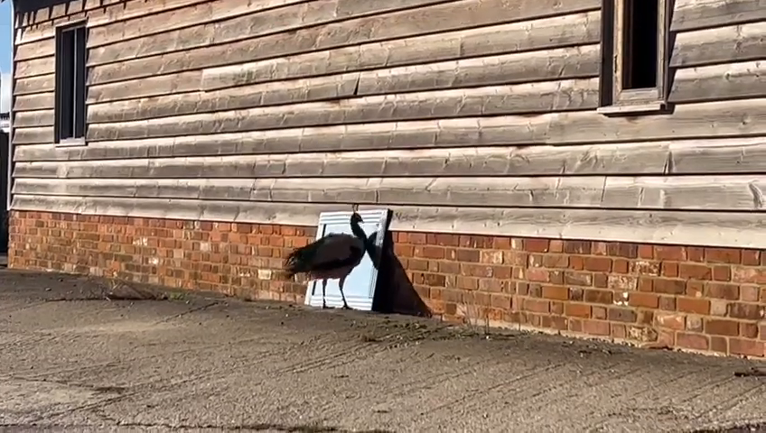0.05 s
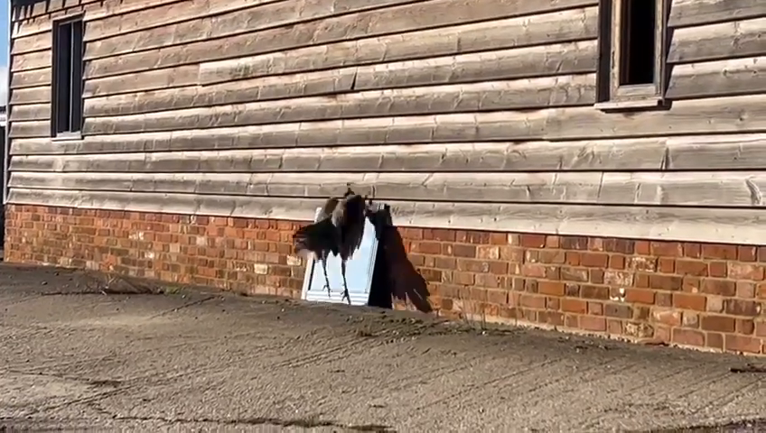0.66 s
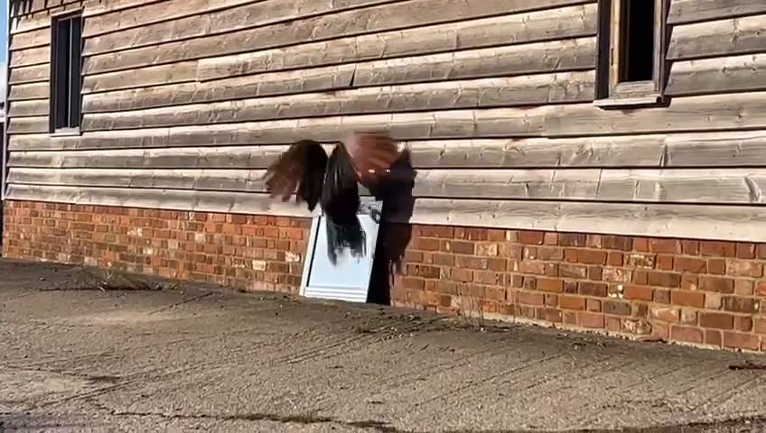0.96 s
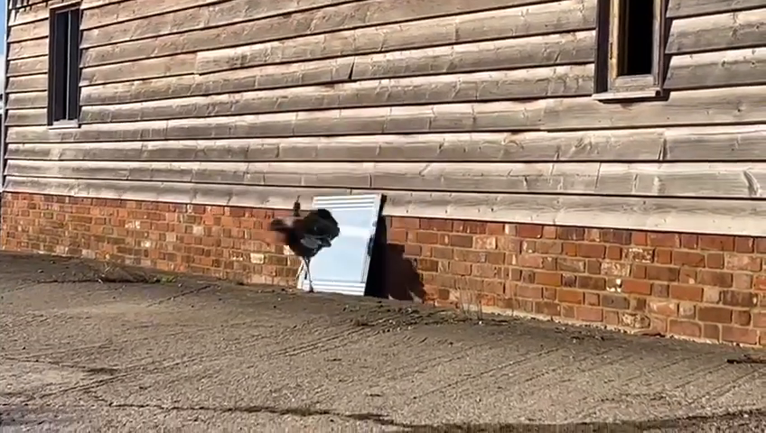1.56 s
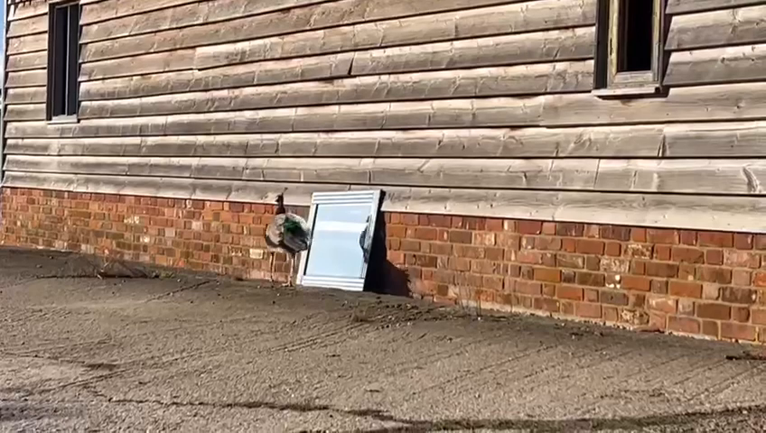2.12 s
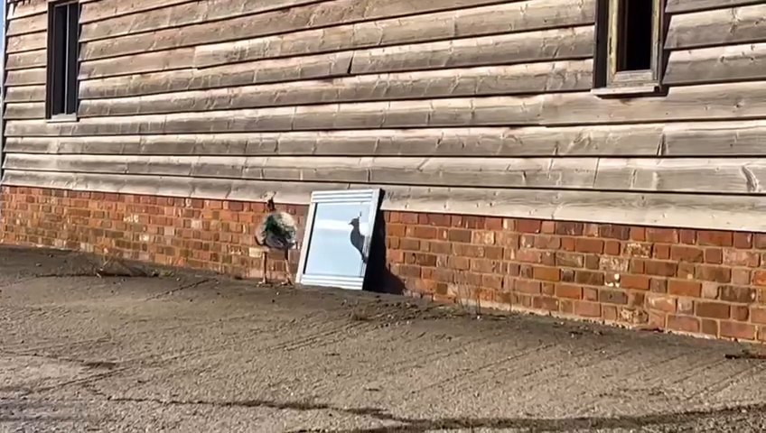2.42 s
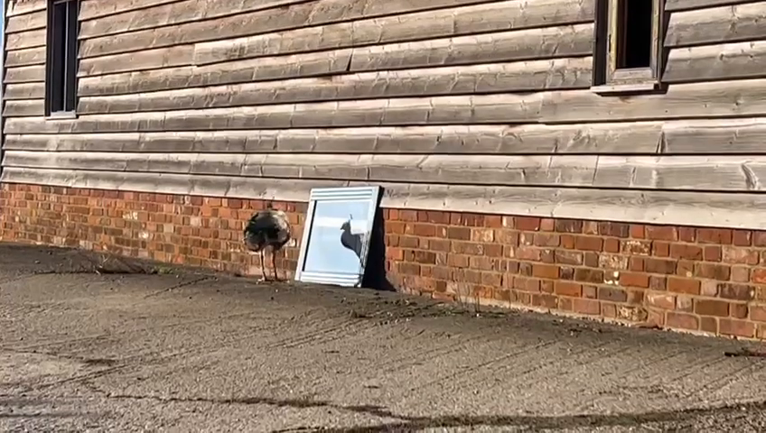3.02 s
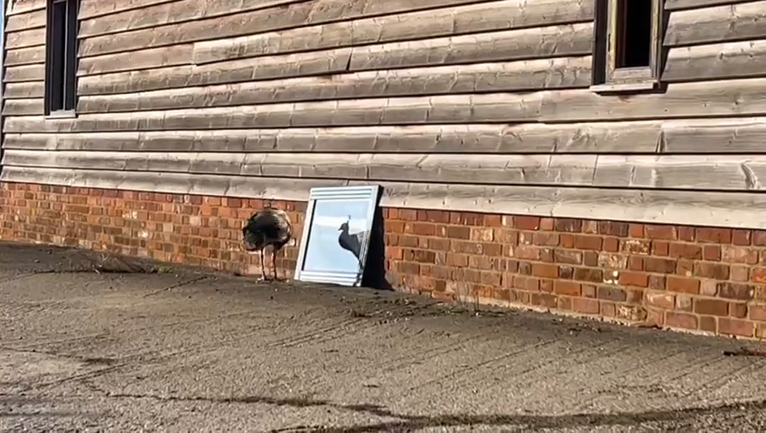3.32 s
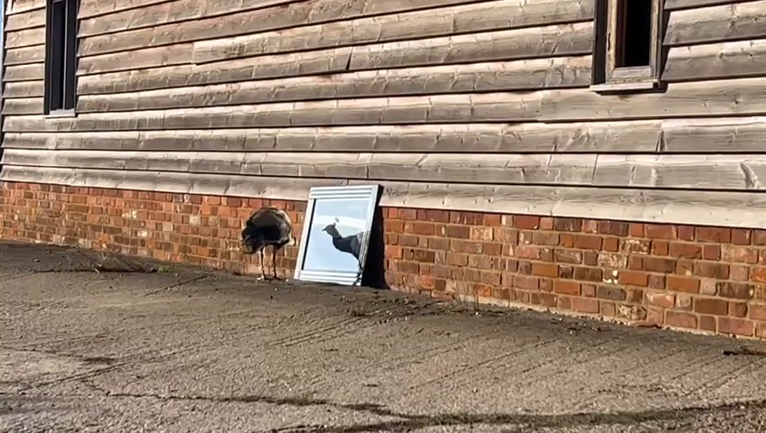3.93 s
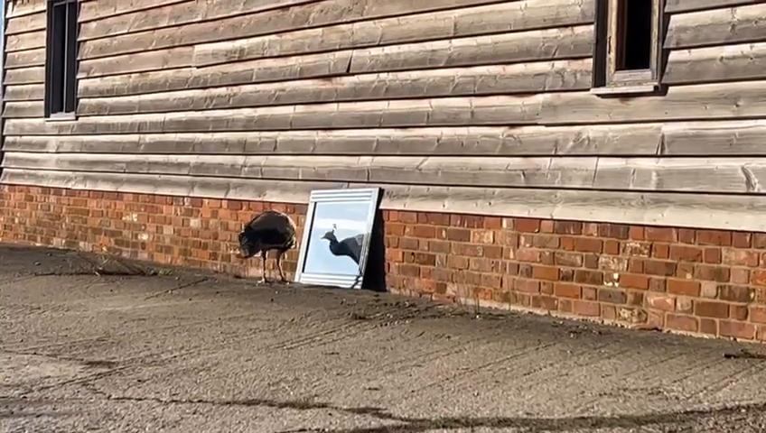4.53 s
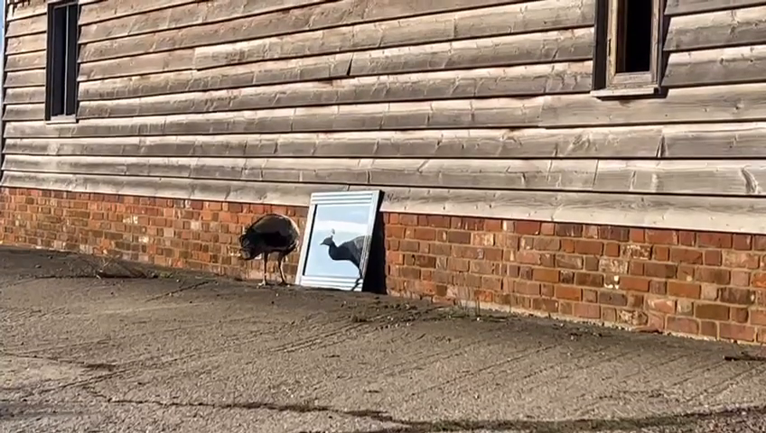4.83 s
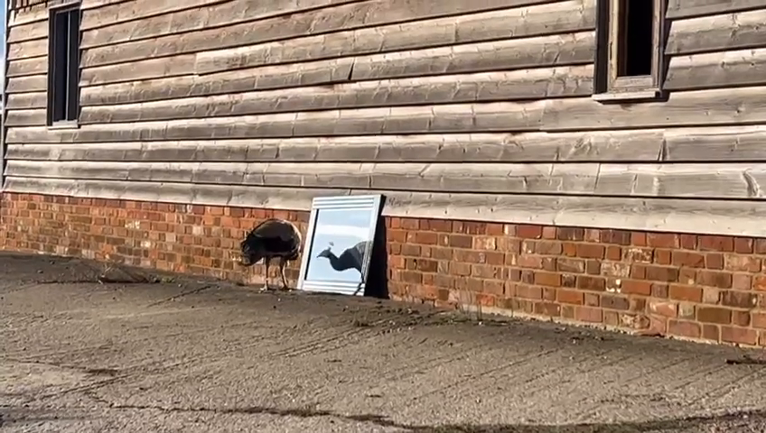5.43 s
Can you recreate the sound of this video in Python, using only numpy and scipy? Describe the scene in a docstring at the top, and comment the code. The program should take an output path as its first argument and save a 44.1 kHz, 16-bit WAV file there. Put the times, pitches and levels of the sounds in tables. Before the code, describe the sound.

A low transformer hum and a breeze rumbling on the microphone fill a farmyard, with a very faint hiss of distant leaves. At about 0.8 seconds a peafowl kicks a mirror leaning on a barn wall: one sharp, clattering knock that briefly rings and rattles the pane, with a short echo. Soft, quick wingbeats swish from 0.7 to 1.3 seconds, and claws tick lightly as the bird comes down. From about 1.8 seconds the wind starts bumping the microphone with dull, low thumps. A small bird nearby gives high, slightly raspy chirps at 3.1 and 3.9 seconds, a quick three around 4.6, and a faint one at 5.3. Something creaks softly at 3.9 seconds. The hum sinks around 4.5 seconds, while the wind thumps come thicker and harder, the loudest at about 5.3 seconds, just before the end.

```python
"""A transformer hums in a barnyard; a breeze rumbles on the microphone and far leaves hiss. At 0.8 s a peafowl
leaps at a mirror leaning on the barn wall: its wings beat from 0.67 s, one clattering kick rings the pane, and
wings and claws go on as it comes down. From 3.1 s a small bird chirps nearby; at 3.9 s something creaks softly.
The hum sinks and the breeze ends in a run of dull thumps as its eddies strike the microphone's two ports."""
import sys
import numpy as np
from scipy import signal
from scipy.fft import rfft, irfft, next_fast_len
from scipy.io import wavfile
from scipy.ndimage import map_coordinates

SR = 44100
rng = np.random.default_rng(int(sys.argv[2]) if len(sys.argv) > 2 else 0)


def persist_wave(psi):
    """Save psi, clipped to +-1, as 16-bit WAV."""
    counts = np.round(np.clip(psi, -1, 1) * 32767).astype(np.int16)
    wavfile.write(sys.argv[1], SR, np.atleast_2d(counts).T)


N = 250047

# Contacts on the mirror. Each row: start in seconds, level in dB, brightness in Hz, ring share in dB.
KICK_CONTACTS = [(.785, -29.5, 2260, -15), (0.7867, -27, 1680, -9), (.7899, -21, 4000, -13),
                 (0.7906, -16.5, 1220, -3), (.7914, -20.5, 600, -2), (0.7955, -26.5, 2300, -7.5),
                 (0.8066, -34, 900, -1.5), (0.8231, -33.5, 762, -6), (.825, -31.5, 170, 2),
                 (.854, -41, 300, 2), (.893, -43, 280, 3), (.921, -38, 620, -15), (.945, -36, 500, -13.5),
                 (.956, -38.5, 700, -11), (0.97, -42.5, 1470, -8)]
# Modes of glass and frame. Each row: frequency in Hz, relative level in dB, t60 in seconds.
MIRROR_MODES = [(108.7, -14.5, 0.18), (209, -10, 0.16), (290.3, 1, 0.13), (349, -4.5, 0.1),
                (525, -11, 0.11), (640, -5.5, 0.082), (800, -17, .07), (1083, -15, 0.073),
                (1225, -21, 0.19), (1511, -8.5, 0.098), (1680, -16, 0.11), (2060, -13, .08),
                (2334, -9, 0.09), (2690, -15, .11), (3770, -20, .12)]
def kick(crack_cycles=24, attack_cycles=1.03, swell_cycles=1.35, sag=.1, sag_s=.022, bend_hz=420):
    """Claws, feet and body hit the glass: each cracks and rings the pane, soft ones only its low modes."""
    out, t = np.zeros(N), clock(SR // 2)
    for start_s, db, bright_hz, ring_db in KICK_CONTACTS:
        ring = np.zeros(len(t))
        for hz, mode_db, t60_s in MIRROR_MODES:
            bend = sag * np.exp(-t / sag_s) / (1 + (hz / bend_hz) ** 4)  # low modes sink as it unbends
            load = .01 * rng.normal() * hz / (hz + bend_hz)  # the bird's weight shifts the loose pane
            rattle = .014 * band(len(t), 60, q=.96)
            phase = 2 * np.pi * hz * np.cumsum(1 + bend + load + rattle) / SR
            gain = amp(mode_db + rng.normal(0, 1)) / np.hypot(1, (hz / bright_hz / 1.25) ** 2)
            ring += gain * fade(t, t60_s) * (1 - np.exp(-t * hz / swell_cycles)) * np.sin(phase)
        attack = 1 - np.exp(-t * bright_hz / attack_cycles)
        crack = band(len(t), bright_hz, q=1.72) * fade(t, crack_cycles / bright_hz) * attack
        add(out, start_s, amp(db) * (crack + amp(ring_db) * ring))
    return out


def kick_tail(level_db=-38.5, t60_s=.18, centre_hz=1970, uneven_db=4):
    """A rough, diffuse noise tail rings on after the main blow."""
    out, t = np.zeros(N), clock(SR // 2)
    blow_s = max(KICK_CONTACTS, key=lambda row: row[1])[0]
    grain = unit(band(len(t), centre_hz, q=.66) * amp(uneven_db * wobble(400)[:len(t)]))
    add(out, blow_s, amp(level_db) * grain * fade(t, t60_s))
    return out


# Wing effort. Each row: time in seconds, level in dB.
WING_EFFORT = [(.67, -63.5), (.83, -58.5), (.92, -61), (1.08, -65.5), (1.16, -62.5), (1.25, -64.5)]
# Wing tips on the wall. Each row: peak time in seconds, level in dB, centre in Hz.
WING_BRUSHES = [(0.744, -59, 3020), (.819, -52.5, 2920), (0.944, -54.5, 2710), (.963, -54.5, 2570),
                (1.011, -56.5, 4690), (1.133, -55.5, 4240), (1.157, -50.5, 6330)]
def wings(first_s=.672, gap_s=.0815, strokes=8, hiss_hz=3860, whoosh_hz=405, whoosh_db=4.5, flutter_db=3):
    """Steady strokes: stiff feathers hiss, push air aside and brush the wall."""
    out, t = np.zeros(N), clock(SR // 4) - 1 / 8

    def swish(hz, sigma_s=.02):
        return band(len(t), hz, q=.68) * np.exp(-(t / sigma_s) ** 2 / 2)

    for peak_s in first_s + gap_s * np.arange(strokes):
        stroke = swish(hiss_hz) + amp(whoosh_db) * swish(whoosh_hz)
        add(out, peak_s + t[0], amp(at_time(WING_EFFORT, peak_s)) * stroke)
    for peak_s, db, hz in WING_BRUSHES:
        add(out, peak_s + t[0], amp(db) * swish(hz, sigma_s=.0071))
    return out * amp(flutter_db * wobble(300))


# Claw contacts. Each row: start in seconds, level in dB, centre in Hz, t60 in seconds, resonance Q.
CLAW_TICKS = [(.988, -51, 4240, .02, 1.2), (.997, -47.5, 4260, 0.047, 1.7), (1.0187, -40.5, 6160, 0.017, 2),
              (1.0206, -43, 3860, 0.018, 1.4), (1.04, -55, 3750, 0.065, .9),
              (1.22, -47.5, 5700, 0.055, 0.59), (1.24, -53, 4170, .012, .7),
              (4.256, -56.5, 6500, 0.018, 0.81), (5.4795, -52, 1890, 0.031, 1.8),
              (5.48, -61, 3360, 0.12, 1.0)]
def claws():
    """Claws tick and scratch on the frame and on gritty concrete."""
    out, t = np.zeros(N), clock(SR // 8)
    for start_s, db, hz, t60_s, q in CLAW_TICKS:
        add(out, start_s, amp(db) * band(len(t), hz, q) * fade(t, t60_s))
    return out


# Arched calls. Each row: start and length in seconds, level in dB, start, top and end pitch in Hz,
# moment of the rise from 0 to 1, opening dip in Hz, harsh onset in dB, upper voice in dB,
# upper voice pitch ratio, fade over the fall in dB.
CHIRPS = [(3.136, 0.2, -52.5, 2460, 3624, 2775, .42, 449.5, -10, -0.5, 1.16, 8.5),
          (3.877, 0.19, -53, 2117, 3380, 1997, 0.28, 0.5, 2, 2, 1.21, 10),
          (4.544, .11, -56.5, 2350, 3115, 2660, 0.36, 101, 0, -5, 1.14, 5.5),
          (4.65, 0.072, -57, 2840, 3750, 3270, 0.16, -0.5, -14, -1, 1.12, 3),
          (4.699, .124, -48, 2500, 3757, 3550, .35, 99.5, -5.5, -11, 1.07, 12),
          (5.345, 0.16, -61, 2740, 3370, 2700, .26, 0.5, -7, -4, 1.2, -2)]
# Chirp colour: bright near 3.8 and 5.3 kHz, dipping between. Each row: frequency in Hz, gain in dB.
CHIRP_COLOUR = [(1900, -8.5), (2500, -3), (3100, -4.5), (3750, 0), (4200, -1.5), (4650, -9.5), (5300, -1),
                (6200, -8), (8000, -9)]
def small_bird(dip_s=.025, rise_s=.006, fall_from=.6, opening_db=-3.5):
    """Both sides of the syrinx chirp: a low harsh opening, a leap to a rasp, then a fall."""
    out = np.zeros(N)
    hiss = .51 * band(N, 5400, q=2.4)
    for (start_s, length_s, db, start_hz, top_hz, end_hz,
         rise_at, dip_hz, harsh_db, upper_db, upper_ratio, fall_db) in CHIRPS:
        progress, gate = note(start_s, length_s)
        dip = np.exp(-(progress * length_s / dip_s) ** 2)
        rise = (1 + np.tanh((progress - rise_at) * length_s / rise_s / 2)) / 2
        fall = np.clip((progress - fall_from) / (1 - fall_from), 0, 1) ** 1.5
        hz = start_hz + dip_hz * dip + (top_hz - start_hz) * rise + (end_hz - top_hz) * fall
        swell = np.clip(1.75 * progress / rise_at, .15, 1) ** 2
        harsh = amp(harsh_db) * (1 - rise) / swell ** .98  # stays level while the fundamental swells in
        upper_gain = amp(upper_db) * (.71 + .29 * rise)
        voice = syrinx(hz, harsh) + upper_gain * syrinx(upper_ratio * hz, harsh) + harsh * hiss
        out += gate * swell * amp(db + opening_db * (1 - rise) - fall_db * fall) * voice
    return filtered(out, lambda hz: amp(at_hz(CHIRP_COLOUR, hz)))


def syrinx(hz, harsh, rasp=.033, hoarse_db=-8, hoarse_hz=330, octave_db=-18, shimmer_db=3):
    """One side of a bird's voice: a rasping tone whose octave grows with harshness."""
    phase = 2 * np.pi * np.cumsum(hz * (1 + rasp * wobble(900))) / SR
    tone = np.sin(phase) + (harsh + amp(octave_db)) * np.sin(2 * phase)
    hoarse = 1 + amp(hoarse_db) * band(N, hoarse_hz, q=1)  # smears the tone into a narrow band
    return tone * unit(hoarse * amp(shimmer_db * wobble(170)))


def note(start_s, length_s, edge_s=.011):
    """Progress from 0 to 1 through a call, and its gate."""
    age_s = clock(N) - start_s
    gate = np.clip(np.minimum(age_s, length_s - age_s) / edge_s, 0, 1)
    return np.clip(age_s / length_s, 0, 1), gate


# Creak swell. Each row: time in seconds, relative level in dB.
CREAK_SWELL = [(3.87, -52), (3.905, -40.5), (4.004, -37), (4.028, -47)]
def creak(first_s=3.8695, gap_s=.021, slowing_s=.00055, slips=8, t60_s=.028, attack_s=.0036):
    """Soft slips slow a little as they swell, each exciting two hollow resonances."""
    out, t = np.zeros(N), clock(SR // 16)
    envelope = fade(t, t60_s) * (1 - np.exp(-t / attack_s))
    for k in range(slips):
        start_s = first_s + k * gap_s + slowing_s * k * (k - 1) / 2
        low = np.sin(2 * np.pi * rng.normal(538, 35) * t)
        high = amp(-14.5) * np.sin(2 * np.pi * rng.normal(1000, 70) * t)
        scrape = .39 * band(len(t), 655, q=3)
        add(out, start_s, 2 * amp(at_time(CREAK_SWELL, start_s)) * (low + high + scrape) * envelope)
    return out


# Eddies on the microphone. Each row: start in seconds, level in dB, start pitch in Hz, t60 in seconds.
EDDY_THUMPS = [(0.67, -30, 101, 0.13), (1.759, -30, 107, 0.31), (2.316, -36, 270, 0.32),
               (2.575, -30.5, 91, 0.27), (2.774, -22.5, 105, 0.13), (2.86, -24, 90.4, 0.16),
               (2.955, -30, 111, 0.26), (3.474, -25, 91, 0.14), (3.799, -35, 207, 0.3),
               (4.085, -21.5, 133, 0.13), (4.151, -22, 103, 0.084), (4.46, -24.5, 263, 0.073),
               (4.478, -24, 60, 0.21), (4.499, -23.5, 330, 0.047), (4.507, -17, 356, 0.07),
               (4.533, -15.5, 109, .07), (4.549, -31.5, 340, .07), (4.574, -20, 413, 0.09),
               (4.915, -18.5, 179, 0.13), (4.953, -27.5, 251, 0.15), (5.016, -35.5, 223, 0.17),
               (5.129, -22, 341, 0.19), (5.153, -22.5, 225, 0.088), (5.231, -27, 181, 0.19),
               (5.3267, -9.5, 411, 0.15), (5.348, -25, 552, 0.081), (5.3835, -19.5, 500, 0.091),
               (5.395, -12.5, 184, 0.075), (5.425, -33.5, 384, 0.18), (5.485, -27.5, 109, 0.15)]
def thumps(glide_s=.00762, attack_s=.0032, puff_db=-14, puff_t60_s=.3, spread=.058, octaves_per_db=.02):
    """Each eddy strikes both ports: a pressure swing that slows as it dies, with a dull puff."""
    out, t = np.zeros((2, N)), clock(SR // 3)
    glide = np.exp(-(t / glide_s) ** 1.95) * (1 + opposed(spread))  # the ports settle together
    attack = 1 - np.exp(-(t / attack_s) ** 2)
    for start_s, db, start_hz, t60_s in EDDY_THUMPS:
        end_hz = 79 * (start_hz / 200) ** .3  # faster eddies settle higher
        hz = end_hz + (start_hz - end_hz) * glide
        swing = np.sin(2 * np.pi * np.cumsum(hz, axis=1) / SR)
        puff = np.array([band(len(t), start_hz, q=1) for port in range(2)])
        push = (swing + amp(puff_db) * puff * fade(t, puff_t60_s)) * fade(t, t60_s) * attack
        cutoff_hz = 1.16 * start_hz * 2 ** (octaves_per_db * (db + 20))  # harder eddies are brighter
        lowpass = signal.butter(2, min(cutoff_hz, SR / 4), fs=SR, output="sos")
        add(out, start_s, amp(db) * signal.sosfilt(lowpass, push))
    return out


# Eddy rustles. Each row: start in seconds, level in dB, centre in Hz, t60 in seconds.
EDDY_SCUFFS = [(5.117, -59, 800, .1), (5.155, -50.5, 470, .2), (5.3275, -37, 650, 0.024),
               (5.346, -50, 700, 0.07), (5.385, -47, 555, .16)]
def scuffs(q=1.6, attack_s=.003):
    """The strongest eddies leave a rough, dull rustle at each port."""
    out, t = np.zeros((2, N)), clock(SR // 3)
    for start_s, db, hz, t60_s in EDDY_SCUFFS:
        rustle = band(len(t), hz, q) + opposed(band(len(t), hz, q))
        add(out, start_s, amp(db) * rustle * fade(t, t60_s) * (1 - np.exp(-t / attack_s)))
    return out


# Gusts. Each row: time in seconds, relative level in dB.
GUSTS = [(0, -61.5), (.27, -50.5), (.58, -55), (.9, -55.5), (1.2, -47), (1.35, -50.5), (1.65, -58),
         (1.8, -44), (2.12, -51.5), (2.35, -43), (2.58, -42), (2.7, -52.5), (2.82, -43.5), (3.04, -43),
         (3.15, -49.5), (3.65, -47.5), (3.9, -46.5), (4.3, -53), (4.5, -39), (4.68, -60.5), (4.86, -58.5),
         (5.05, -45.5), (5.28, -36.5), (5.44, -34), (5.56, -50)]
# Wind rumble. Each row: frequency in Hz, relative density in dB.
RUMBLE_SPECTRUM = [(20, -23.5), (35, -6.5), (55, 1), (80, 2), (130, -7), (250, -20.5), (450, -38.5),
                   (900, -51), (2000, -100)]
def breeze(gain_db=3, lumps_db=3, flutter_db=3.5, flutter_hz=520):
    """Lumpy low turbulence at the microphone; the strongest gusts add a higher flutter."""
    flow = amp(at_time(GUSTS, clock(N)) + gain_db)
    lumps = unit(amp(lumps_db * wobble(25)))
    flutter = np.array([band(N, flutter_hz, q=1) for port in range(2)])
    return lumps * (flow * rush(RUMBLE_SPECTRUM) + amp(flutter_db) * flow ** 2 * flutter)


# Hum loudness. Each row: time in seconds, level in dB.
HUM_LEVEL = [(0, -49), (.3, -43), (2.9, -43.5), (3.8, -45), (4.35, -44.5), (4.72, -53.5), (5.67, -55.5)]
# Hum lines. Each row: multiple of the fundamental, relative level in dB.
HUM_LINES = [(1, -0.5), (2, -10), (3, -37), (4, -32.5), (6, -39), (9.5, -35), (10, -35)]
def transformer(fundamental_hz=99.97, drift=.000756, waver_db=1.3):
    """A transformer hums in lines that waver slightly together."""
    phase = 2 * np.pi * np.cumsum(fundamental_hz * (1 + drift * wobble(2.92))) / SR
    lines = sum(amp(db) * np.sin(k * phase + 2 * np.pi * rng.random()) for k, db in HUM_LINES)
    return np.sqrt(2) * amp(at_time(HUM_LEVEL, clock(N)) + waver_db * wobble(7)) * lines


# Distant calls. Each row: start in seconds, length in seconds, level in dB.
FAR_CALLS = [(0.168, 0.15, -75), (0.279, 0.11, -72), (2.316, .14, -73)]
def far_bird(from_hz=4900, to_hz=2410, broken_db=4.5):
    """A bird further off: faint, hoarse, broken calls that slide down."""
    out = np.zeros(N)
    for start_s, length_s, db in FAR_CALLS:
        progress, gate = note(start_s, length_s)
        hz = from_hz * (to_hz / from_hz) ** progress
        out += gate * amp(db + broken_db * wobble(60)) * syrinx(hz, harsh=0, rasp=.08, hoarse_db=-1.5)
    return out


# Far murmur. Each row: frequency in Hz, relative density in dB.
MURMUR_SPECTRUM = [(30, -19.5), (150, 10.5), (300, 6.5), (500, 1.5), (750, -0.5), (1000, 0.5),
                   (1350, -12.5), (2500, -12.5), (4000, -14.5), (6000, -19.5), (8500, -18), (9400, -28.5),
                   (12000, -25)]
# Foliage loudness. Each row: time in seconds, level in dB.
LEAF_LEVEL = [(0, -75.5), (1.3, -69.5), (2, -70), (2.6, -70), (3.1, -75.5), (3.55, -84.5), (4, -72.5),
              (4.9, -71), (5.67, -72.5)]
# Foliage hiss. Each row: frequency in Hz, relative density in dB.
LEAF_SPECTRUM = [(500, -23), (2000, -4.5), (4000, -1.5), (8000, -1), (9500, -11), (12000, -15)]
def countryside(murmur_db=-62):
    """A steady far murmur, and foliage that hisses as the wind comes and goes."""
    murmur = amp(murmur_db + .43 * wobble(3.1)) * rush(MURMUR_SPECTRUM)
    leaves = amp(at_time(LEAF_LEVEL, clock(N)) + 1.8 * wobble(13)) * rush(LEAF_SPECTRUM)
    return murmur + leaves


# Stereo width of the background noise. Each row: frequency in Hz, left-right correlation.
STEREO_CORRELATION = [(30, 0.97), (60, 0.84), (130, 0.24), (300, 0.3), (500, 0.56), (1000, 0.04),
                      (1600, 0.99), (3000, 1), (6000, 1)]
def rush(spectrum):
    """Stereo noise of rms 1: wide in the low mids, centred in the treble."""
    def response(hz):
        angle = np.arccos(np.clip(at_hz(STEREO_CORRELATION, hz), -1, 1)) / 2
        return amp(at_hz(spectrum, hz)) * [np.cos(angle), np.sin(angle)]

    mid, side = filtered(rng.standard_normal((2, N)), response)
    return unit(np.array([mid + side, mid - side]))


# Yard reverberation. Each row: frequency in Hz, t60 in seconds.
YARD_DECAY = [(150, 0.93), (600, 0.33), (3000, 0.54), (6000, 0.063), (10000, 0.32)]
def in_yard(x, wet_db, width=.19):
    """The direct sound and its scatter off the barn walls, in stereo."""
    hz, t, noise = signal.stft(rng.standard_normal((2, SR // 2)), SR, nperseg=256)
    mid, side = signal.istft(noise * fade(t, at_hz(YARD_DECAY, hz)[:, None]), SR, nperseg=256)[1]
    tail = np.array([mid + width * side, mid - width * side]) / np.linalg.norm(mid)
    delayed = np.pad(tail, ((0, 0), (SR // 200, 0)))
    return x + amp(wet_db) * signal.fftconvolve(x[None], delayed, axes=1)[:, :N]


def with_wall_echo(x, delay_s=.062, echo_db=-10, corner_hz=430):
    """The sound and its low part returned by a far wall."""
    echo = filtered(x, lambda hz: np.exp(-2j * np.pi * hz * delay_s) / (1 + 1j * hz / corner_hz) ** 2)
    return x + amp(echo_db) * echo


def field_echo(x, delay_s=.122, echo_db=-25):
    """A late, scattered return from a building across the field."""
    delayed = np.pad(x, (round(delay_s * SR), 0))[:N]
    return amp(echo_db) * in_yard(delayed, wet_db=-2)


def amp(db):
    """Decibels to gain."""
    return 10 ** (np.asarray(db) / 20)


def unit(x):
    """Scale to rms 1."""
    return x / np.sqrt(np.mean(x ** 2) + 1e-20)


def clock(size):
    """Sample times in seconds."""
    return np.arange(size) / SR


def fade(t, t60_s):
    """Exponential decay by 60 dB in t60_s."""
    return np.exp(-np.log(1000) * t / t60_s)


def opposed(difference):
    """Half to the left, minus half to the right."""
    return np.array([[.5], [-.5]]) * difference


def at_hz(points, hz):
    """Interpolate (Hz, value) rows on a log axis."""
    knots_hz, values = np.transpose(points)
    return np.interp(np.log(hz + 1), np.log(knots_hz + 1), values)


def at_time(points, t):
    """Interpolate (seconds, value) rows."""
    return np.interp(t, *np.transpose(points))


def wobble(knots_per_s):
    """A smooth random curve."""
    return map_coordinates(rng.standard_normal(int(N * knots_per_s / SR) + 4), [clock(N) * knots_per_s])


def filtered(x, response):
    """Apply a frequency response to x."""
    size = x.shape[-1]
    padded = next_fast_len(size + SR // 4)
    return irfft(rfft(x, padded) * response(np.fft.rfftfreq(padded, 1 / SR)), padded)[..., :size]


def band(size, hz, q):
    """Noise of rms 1 in one broad resonance with steep skirts."""
    resonance = lambda f: (f * hz / q / np.abs(hz * hz - f * f + 1j * f * hz / q)) ** 2
    return unit(filtered(rng.standard_normal(size), resonance))


def add(track, start_s, x):
    """Mix x into the track."""
    part = track[..., round(start_s * SR):][..., :x.shape[-1]]
    part += x[..., :part.shape[-1]]


def scene():
    """The birds and the creak in the yard, over countryside, hum and wind."""
    mirror = in_yard(with_wall_echo(kick() + kick_tail()), wet_db=-12.5, width=.23)
    peafowl = in_yard(wings() + claws(), wet_db=-8.5)
    calls = small_bird() + far_bird()
    songbirds = in_yard(calls, wet_db=-14) + field_echo(calls)
    creaking = in_yard(creak(), wet_db=-12, width=.9)
    background = countryside() + transformer()
    wind = breeze() + thumps() + scuffs()
    return mirror + peafowl + songbirds + creaking + background + wind


# Stereo phase. Each row: frequency in Hz, right minus left in radians.
STEREO_PHASE = [(100, 0), (6500, 0), (7800, 0.24), (8600, 0.27), (9100, 3.5)]
# Stereo balance. Each row: frequency in Hz, left minus right in dB.
STEREO_BALANCE = [(400, -0.5), (620, 0), (1100, 3), (1900, 0)]
def record(dry, limit_hz=12000):
    """Overall stereo colour: mids lean left; the top treble is faint, wide and out of phase."""
    colour_hz_db = [(5000, -.5), (8500, -1.5), (9500, -5), (12000, 3.5)]

    def response(hz):
        phase = np.exp(-1j * opposed(at_hz(STEREO_PHASE, hz)))
        balance = amp(opposed(at_hz(STEREO_BALANCE, hz)))
        return amp(at_hz(colour_hz_db, hz)) * phase * balance * (hz < limit_hz)

    return filtered(dry, response)


dry = scene()
out = record(dry)
persist_wave(out)
```